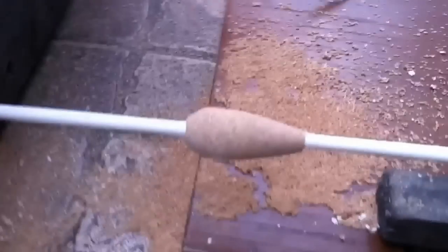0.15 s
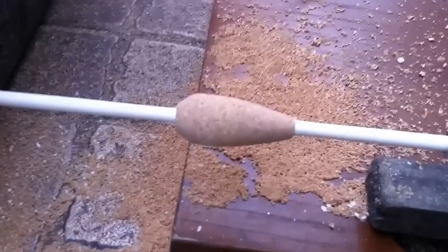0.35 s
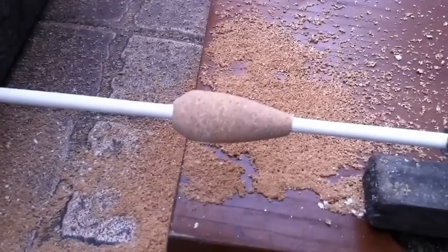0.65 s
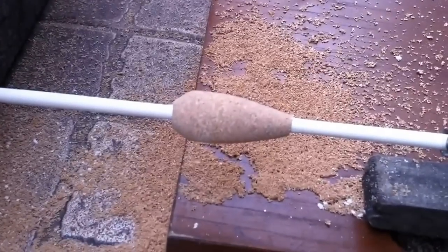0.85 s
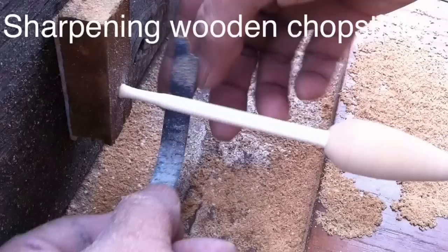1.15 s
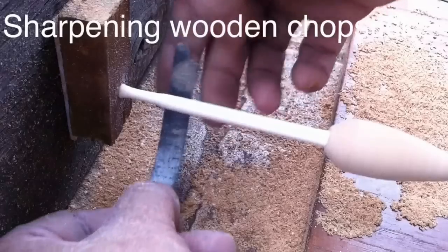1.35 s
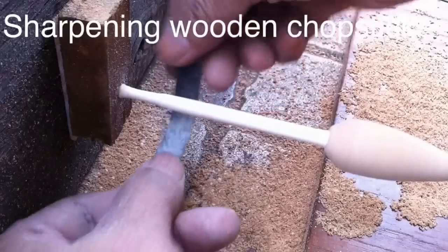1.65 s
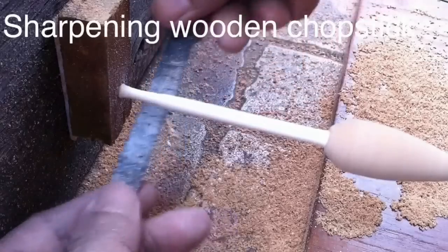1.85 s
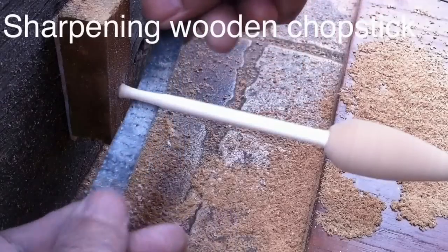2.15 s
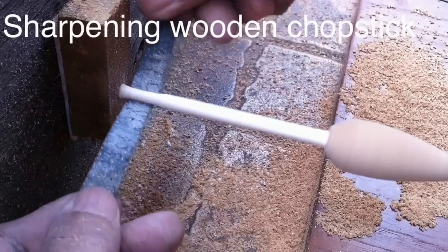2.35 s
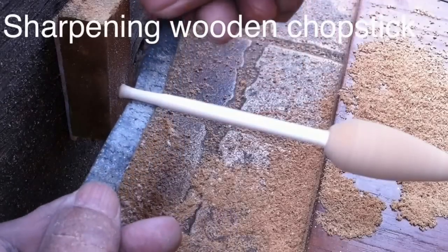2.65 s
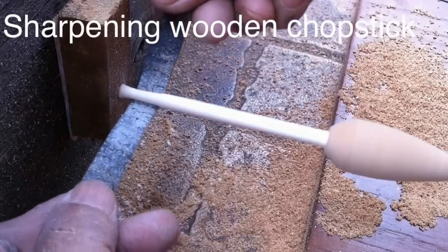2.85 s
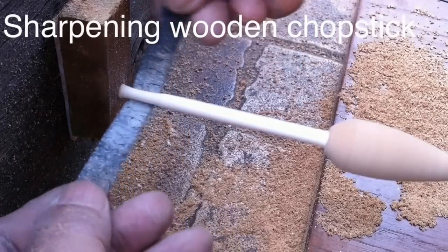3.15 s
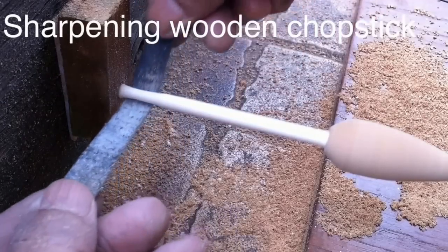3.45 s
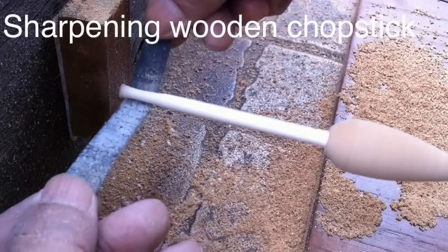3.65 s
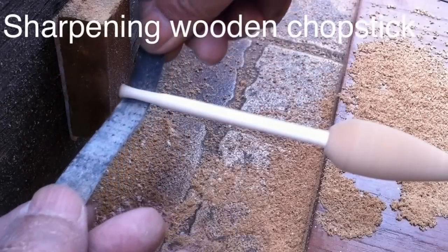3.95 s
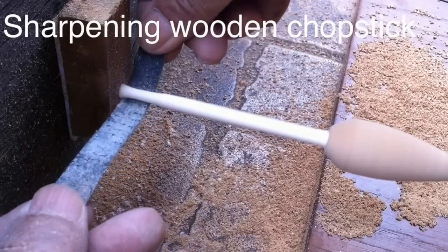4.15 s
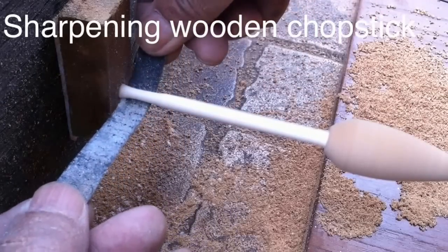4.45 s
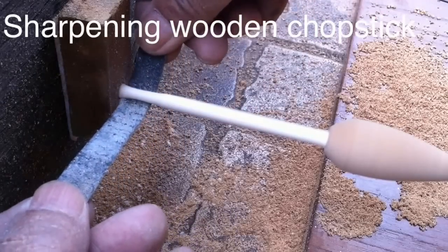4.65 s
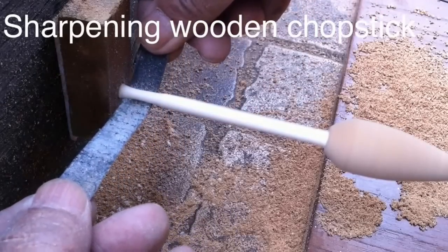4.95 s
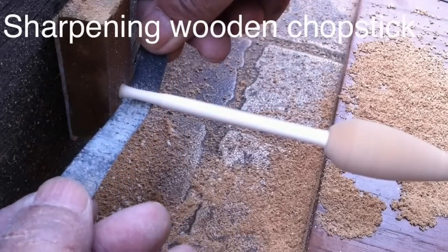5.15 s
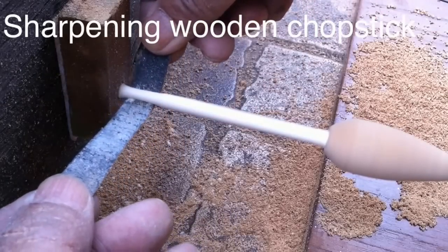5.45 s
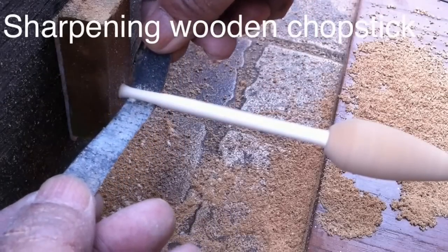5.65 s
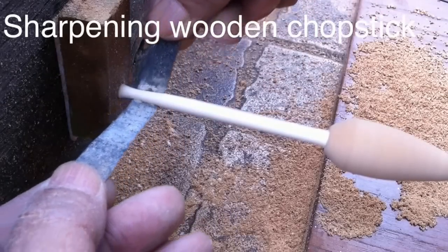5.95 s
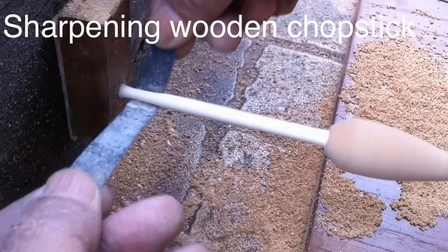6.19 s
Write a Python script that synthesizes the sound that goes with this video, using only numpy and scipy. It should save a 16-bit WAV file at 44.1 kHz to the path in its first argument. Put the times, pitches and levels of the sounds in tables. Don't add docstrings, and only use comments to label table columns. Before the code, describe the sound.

Near-silent porch with dull traffic rumble, a quick bright rustle, light ticks and one weak squeak. Hard cut to a small power tool spinning wood against sandpaper, close to a phone microphone: steady motor whine, broad airy roar, scratchy treble. The whine grows sharper midway as a hand uncovers the vent, pitch sagging barely, while the level briefly ducks and recovers. No wind-down; almost mono, dry outdoors.

```python
import sys
import numpy as np
from scipy import signal
from scipy.fft import rfft, irfft
from scipy.io import wavfile
from scipy.ndimage import uniform_filter1d

SR = 44100
rng = np.random.default_rng(int(sys.argv[2]) if len(sys.argv) > 2 else 0)


def invert_db(level):
    return 10 ** (np.asarray(level, dtype=float) / 20)


def log_audio(samples):
    frames = np.atleast_2d(samples).T
    limited = np.clip(frames, -1, 1)
    pcm = np.round(limited * 32767).astype(np.int16)
    wavfile.write(sys.argv[1], SR, pcm)


N = 278712
time = np.arange(N) / SR
CUT_S, START_S = 1.165, 1.1862
TOP_HZ = 15760
FRAME = 1024


def curves(table):
    s, *columns = np.transpose(table)
    return [np.interp(time, s, c) for c in columns]


def unit(x):
    return x / np.sqrt(np.mean(x ** 2))


def bell(middle, half):
    return np.exp(-((time - middle) / half) ** 2)


def walk(rate):
    k = int(SR / rate)
    held = np.repeat(rng.standard_normal(N // k + 1), k)
    smooth = uniform_filter1d(uniform_filter1d(held, k), k)
    return unit(smooth[:N])


def colour(x, points, peaks=()):
    hz = np.arange(N // 2 + 1) * SR / N + 1
    point_hz, point_db = np.array(points).T
    db = np.interp(np.log(hz), np.log(point_hz), point_db)
    for centre_hz, width_hz, peak_db in peaks:
        db = db + peak_db / (1 + (2 * (hz - centre_hz) / width_hz) ** 2)
    return irfft(rfft(x) * invert_db(db), N)


def band(x, lo_hz, hi_hz):
    hz = np.arange(N // 2 + 1) * SR / N
    return irfft(rfft(x) * (hz > lo_hz) * (hz < hi_hz), N)


def octaves(x, flicker_db, rate):
    spectrum = rfft(x)
    place = np.log2(np.arange(N // 2 + 1) * SR / N / 60 + 1e-9)
    place = np.clip(place, 0, 8)
    out = np.zeros(N)
    for k in range(9):
        octave = irfft(spectrum * np.clip(1 - abs(place - k), 0, 1), N)
        out += octave * invert_db(flicker_db * walk(rate))
    return out


# f/Hz, level/dB
PORCH_TONE = [(30, -39), (75, -41), (110, -1.5), (150, -2.5), (190, -6.5), (270, -3.5), (350, -9.5),
              (520, -15), (1000, -18.5), (1500, -23), (2020, -22), (2250, -28), (5000, -34.5),
              (16000, -49.5)]


def far_traffic():
    air = colour(rng.standard_normal(N), PORCH_TONE)
    rumble = unit(colour(air, [(330, -17.5), (450, -34)]))
    murmur = unit(colour(air, [(330, -40), (420, -12), (2100, -10.5), (2300, -8.0), (4500, -12.5)]))
    rumble_db = -39.0 + 1.8 * walk(5.9)
    murmur_db = -45.5 - 2.5 * time + 0.68 * walk(14.6)
    return invert_db(rumble_db) * rumble + invert_db(murmur_db) * murmur


# middle t/s, half length t/s, peak level/dB
RUSTLE_SWELLS = [
    (.075, .03, -57),
    (.128, .022, -54),
    (.2, 0.028, -53),
    (.29, .06, -65),
    (.6, .12, -68),
    (1.09, .05, -67),
]


def rustle():
    hiss = colour(rng.standard_normal(N), [(2200, -26.5), (3000, -1), (4500, 1.0), (6000, -11.0),
                                           (11000, -6.5), (16000, -11)])
    swell = invert_db(-66) + sum(invert_db(peak_db) * bell(s, half) for s, half, peak_db in RUSTLE_SWELLS)
    return swell * invert_db(3.0) * unit(hiss)


# t/s, peak level/dB, body f/Hz, time to fall 60 dB t/s, crack level/dB
KNOCKS = [
    (.1803, -22, 650, .009, -31),
    (.219, -37, 1800, .01, -44),
    (.2865, -29, 550, .008, -50),
    (.6, -38, 1100, .04, -55),
]


def ticks():
    crack = unit(colour(rng.standard_normal(N), [(300, -10), (1500, .1), (6000, -6), (16000, -16)]))
    out = np.zeros(N)
    for s, peak_db, body_hz, t60, crack_db in KNOCKS:
        age = np.clip(time - s, 0, None)
        out -= invert_db(peak_db - 60 * age / t60) * np.sin(2 * np.pi * body_hz * age)
        out += (time > s) * invert_db(crack_db - 60 * age / .015) * crack
    return out


def squeak():
    start_s, attack_s, hold_s, release_s = 0.834, 0.071, .02, 0.098
    level_db, middle_hz, wobble_hz, wobble_s = -45.5, 986, 9, .11
    age = time - start_s
    end = attack_s + hold_s + release_s
    shape = np.clip(np.minimum(age / attack_s, (end - age) / release_s), 0, 1)
    hz = middle_hz + wobble_hz * np.cos(2 * np.pi * age / wobble_s)
    return shape * np.sqrt(2) * invert_db(level_db) * np.sin(2 * np.pi * np.cumsum(hz) / SR)


def porch():
    return far_traffic() + rustle() + ticks() + squeak()


# t/s, share of the later colour (0-1)
HANDS = [
    (1.19, 0.02),
    (2.9, 0.48),
    (4.2, 0.95),
    (6.32, 0.8),
]


def later_share():
    return curves(HANDS)[0]


# middle t/s, half length t/s, depth level/dB
HAND_SHADE = [
    (1.3, .25, 4),
    (1.8, .2, 4),
    (3.5, .3, 5),
    (4.65, .25, 2.5),
    (6.1, .25, 4),
]


def line_levels():
    uncover_s, step_s, grow_s, uncover_db = 2.97, .04, 1.0, 8
    age = np.clip(time - uncover_s, 0, None)
    opened = .5 * (2 - np.exp(-age / step_s) - np.exp(-age / grow_s))
    shaded_db = sum(depth_db * bell(s, half) for s, half, depth_db in HAND_SHADE)
    slot_db = -24.5 + .5 * walk(6)
    fan_db = -27 + uncover_db * opened + .4 * walk(6)
    overtone_db = -22.5 - .9 * (time - START_S) - shaded_db
    return slot_db, fan_db, overtone_db


# t/s, f/Hz
SHAFT_SPEED = [(1.19, 420.9), (1.8, 420.45), (3, 420.18), (4.4, 419.55), (6.32, 418.43)]
# multiple of shaft speed, level/dB
GEAR_TONES = [(3.712, -43), (3.81, -46), (3.903, -42), (4.095, -47), (4.57, -42), (12.098, -36)]
# multiple of shaft speed, early level/dB, later level/dB
SHAFT_TONES = [(1, -38, -36.5), (2, -35.5, -34.5), (4, -36, -40), (5, -42, -40), (6, -38.5, -36),
               (7, -43, -41.5), (10, -43, -44), (11, -45, -40), (13, -39, -44), (15, -39.5, -40.5),
               (16, -43, -44), (17, -42, -39), (19, -49, -46), (23, -46.5, -42.5), (24, -37, -45),
               (25, -42.5, -44), (26, -42, -43), (29, -48, -44), (30, -41, -37), (31, -41.5, -43),
               (32, -45.5, -43), (33, -44.5, -50), (34, -47, -47.5), (35, -50, -43.5), (36, -46.5, -37.5),
               (37, -49.5, -45.5)]


def whine():
    slot_db, fan_db, overtone_db = line_levels()
    shaft_hz = curves(SHAFT_SPEED)[0] + .1 * walk(25)
    turn = 2 * np.pi * np.cumsum(shaft_hz) / SR
    lines = [(12, slot_db), (14, fan_db), (28, overtone_db)]
    lines += GEAR_TONES
    share = later_share()
    for multiple, early_db, late_db in SHAFT_TONES:
        lines.append((multiple, early_db + share * (late_db - early_db)))
    waver = [walk(9.8) for _ in range(6)]
    start = 2 * np.pi * rng.random(len(lines))
    out = np.zeros(N)
    for k, (multiple, db) in enumerate(lines):
        level = np.sqrt(2) * invert_db(db + .6 * waver[k % 6])
        out += level * np.sin(multiple * turn + start[k])
    return out, turn


# delay t/s, level/dB, slow drift of the delay t/s
NEAR_ECHOES = [(.0018, -15, .00004), (.0029, -15, .00005), (.0041, -16, .00006), (.0072, -17, .00005)]


def echoes(x):
    treble = colour(x, [(3500, -30), (7500, 0)])
    out = x
    for delay, db, drift in NEAR_ECHOES:
        out = out + invert_db(db) * np.interp(time - delay - drift * walk(1.5), time, treble)
    return unit(out)


# f/Hz, level/dB
RUSH_EARLY = [(24, -79), (40, -58), (167, -20), (256, -6), (422, -10), (491, -12), (852, -1), (1810, -5.5),
              (3060, -3.5), (3300, 3.5), (4030, -4.5), (5180, -3), (8340, -9), (11800, -14.5),
              (16000, -18.5)]
# f/Hz, level/dB
RUSH_LATE = [(24, -84), (40, -64), (85, -38), (256, -11.5), (382, -10.5), (412, -8), (479, -11.5),
             (852, -5.5), (1810, -9), (3300, -7.5), (4030, -7), (6020, -7), (8340, -10), (14800, -9),
             (16000, -20)]
# f/Hz, width f/Hz, early level/dB, later level/dB
RESONANCES = [(276, 140, -1.5, 1.5), (476, 57, -1, -6.5), (887, 160, 3.5, 4.5), (933, 36, 2, -2),
              (1002, 87, -0.5, -2.5), (1134, 22, -7, 3), (3690, 51, 0, -2), (1840, 350, -5, -3.5),
              (1963, 130, 3.5, 8), (2540, 270, -4.5, 4.5), (3320, 330, -0.5, 8), (4050, 300, -0.5, -5.5),
              (4710, 230, 3, 2), (4780, 120, -5, -8.5), (5480, 200, -2.5, -3), (5240, 310, 5, 1.5),
              (5910, 400, -4.5, 5.5), (7280, 530, -1.5, 5), (8370, 430, -3.5, -3.5), (8900, 660, 5, 0.5),
              (10060, 420, 4.5, -1), (11900, 590, 12, -4.5), (13460, 420, 7.5, -10)]


def rush(turn):
    early_peaks = [(hz, width, early_db) for hz, width, early_db, _ in RESONANCES]
    late_peaks = [(hz, width, late_db) for hz, width, _, late_db in RESONANCES]
    early = unit(colour(rng.standard_normal(N), RUSH_EARLY, early_peaks))
    late = unit(colour(rng.standard_normal(N), RUSH_LATE, late_peaks))
    share = later_share()
    air = echoes(np.sqrt(1 - share) * early + np.sqrt(share) * late)
    air = octaves(air, flicker_db=0.44, rate=9)
    hardness_db = 2.5 * np.minimum(rng.exponential(size=N), 4)
    grains = (rng.random(N) < .08) * rng.standard_normal(N) * invert_db(hardness_db)
    grit = unit(colour(grains, [(3000, -35.5), (7000, 0.5), (12000, 1), (16000, -6)]))
    return air * (1 + 0.055 * np.sin(turn)) + invert_db(-16.5 + 3.8 * walk(14)) * grit


# t/s, depth level/dB
GAIN_DIPS = [(1.26, 2.5), (1.835, 3.5), (2.11, 2), (2.355, 3), (2.605, 3), (2.97, 1.5), (3.3, 1), (3.79, 2),
             (4.44, 1.5), (4.99, 2), (5.39, 2.5), (5.55, 2), (6.05, 1.5)]


def gain_control():
    drop_s, recover_db_per_s = .02, 14
    level_db = -11.54 - 1.16 * later_share() + 0.3 * walk(3)
    for s, depth_db in GAIN_DIPS:
        age = np.clip(time - s, 0, None)
        recovering_db = np.clip(depth_db - recover_db_per_s * age, 0, None)
        level_db = level_db - np.minimum(age / drop_s, 1) * recovering_db
    return level_db


def drill():
    lines, turn = whine()
    level_db = gain_control()
    dips_db = level_db - uniform_filter1d(level_db, SR // 3)
    return lines * invert_db(dips_db) + rush(turn) * invert_db(level_db)


def lapped(window):
    n, k = np.arange(2 * FRAME)[:, None] + .5, np.arange(FRAME) + .5
    waves = np.cos(np.pi / FRAME * (n + FRAME / 2) * k)
    return window[:, None] * waves * np.sqrt(2 / FRAME)


def coarse_treble(x, step_db, rise_db, scatter_db, lowest_hz):
    basis = lapped(np.sin(np.pi * (np.arange(2 * FRAME) + .5) / (2 * FRAME)))
    count = N // FRAME + 2
    padded = np.pad(x, (FRAME, count * FRAME - N))
    coef = padded[np.arange(count)[:, None] * FRAME + np.arange(2 * FRAME)] @ basis
    hz = (np.arange(FRAME) + .5) * SR / (2 * FRAME)
    typical = uniform_filter1d(np.sqrt(abs(coef)), size=80, axis=1) ** 2 + 1e-9
    uneven_db = scatter_db * np.repeat(rng.standard_normal((count, FRAME // 32)), 32, axis=1)
    step = typical * invert_db(step_db + rise_db * hz / TOP_HZ + uneven_db)
    edge_hz = TOP_HZ + 60 - 70 * rng.exponential(size=(count, 1))
    rounded = np.round(coef / step) * step
    coef = np.where(hz > lowest_hz, rounded, coef) * (hz < edge_hz)
    halves = (coef @ basis.T).reshape(count, 2, FRAME)
    return (halves[1:, 0] + halves[:-1, 1]).ravel()[:N]


# t/s, low f/Hz, high f/Hz, level/dB
NOISE_PATCHES = [(1.2216, 6200, 7600, -26), (1.6164, 6830, 8300, -27), (1.9182, 13800, 15850, -35),
                 (3.7758, 9580, 11050, -27), (4.8672, 8900, 10300, -28), (5.2851, 4260, 5200, -24),
                 (5.2851, 9600, 11400, -28), (5.4941, 9620, 11780, -28), (5.8424, 6250, 8250, -23),
                 (5.9353, 11570, 13830, -26), (5.9585, 4230, 5770, -24)]


def stereo_patches():
    basis = lapped(signal.windows.kaiser_bessel_derived(2 * FRAME, 4 * np.pi))
    grid = 626
    hz = (np.arange(FRAME) + .5) * SR / (2 * FRAME)
    side = np.zeros(N)
    for s, lo_hz, hi_hz, side_db in NOISE_PATCHES:
        start = grid + FRAME * int(round((s * SR - grid) / FRAME) - 1)
        burst = basis @ (rng.standard_normal(FRAME) * (hz > lo_hz) * (hz < hi_hz))
        side[start:start + 2 * FRAME] += invert_db(side_db - 3.5) * unit(burst)
    return side


def scene():
    before = np.clip((CUT_S - time) / .003, 0, 1)
    after = np.clip((time - START_S) / .0006, 0, 1)
    return np.tile(porch() * before + drill() * after, (2, 1))


def low_pass(x):
    return signal.sosfilt(signal.butter(12, 16390, fs=SR, output="sos"), x)


def record(dry):
    x = dry[0] - .11 * np.clip(dry[0], -1.6, 1.6) ** 3
    x = signal.sosfilt(signal.butter(3, 70, "high", fs=SR, output="sos"), x)
    late = coarse_treble(x, step_db=3.5, rise_db=6.5, scatter_db=1.5, lowest_hz=3000)
    early = band(x * (time < START_S), 10, TOP_HZ) * (time < CUT_S)
    x = np.where(time > START_S, late, early)
    mix = x + stereo_patches() * np.array([[1], [-1]])
    return low_pass(mix)


dry = scene()
out = record(dry)
log_audio(out)
```